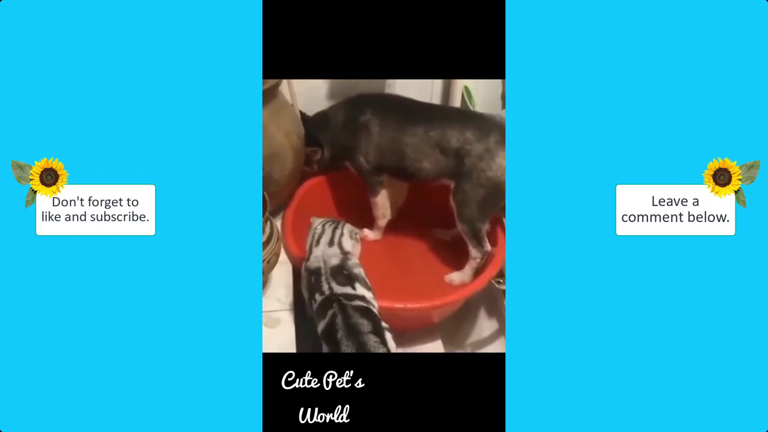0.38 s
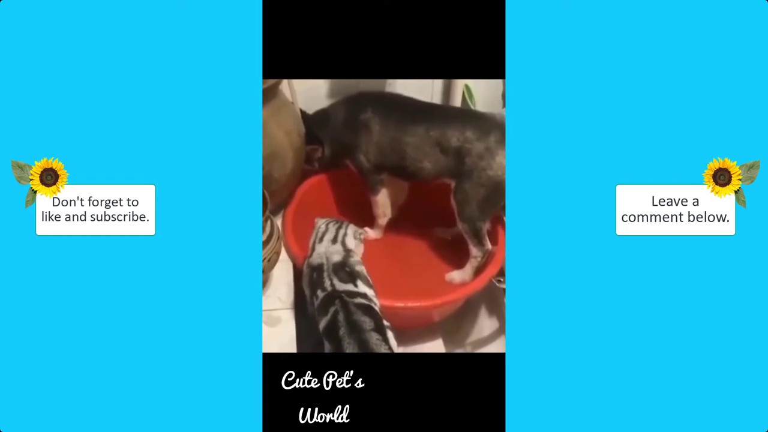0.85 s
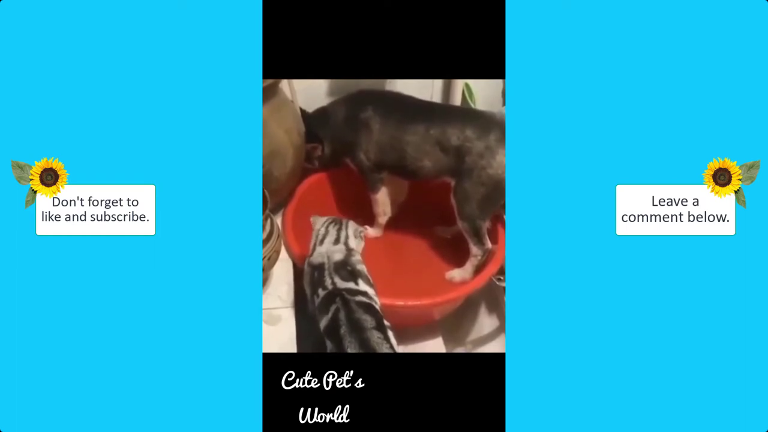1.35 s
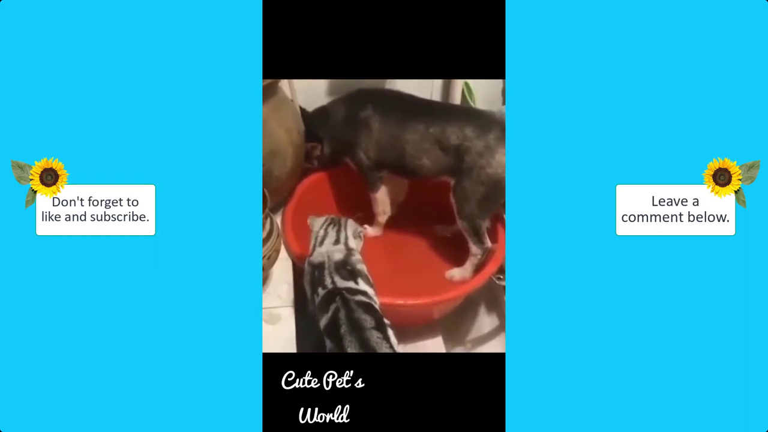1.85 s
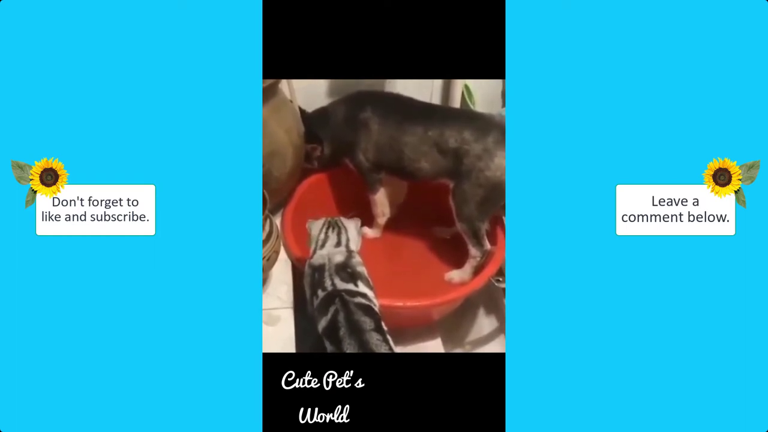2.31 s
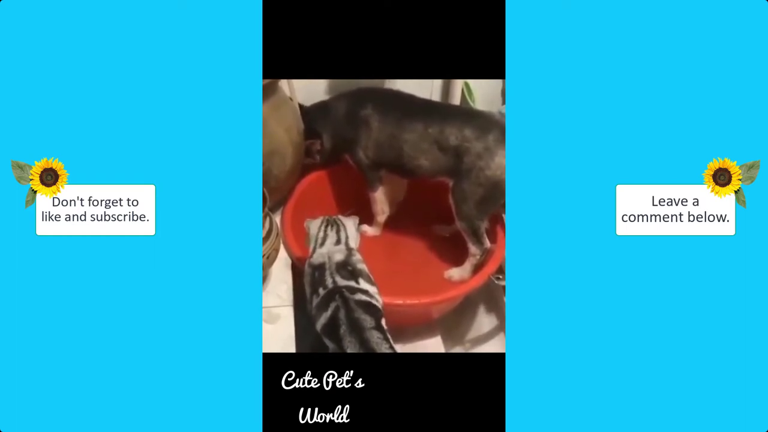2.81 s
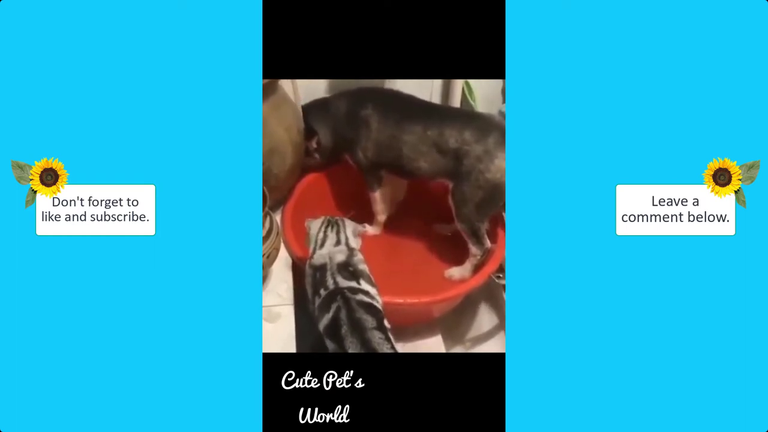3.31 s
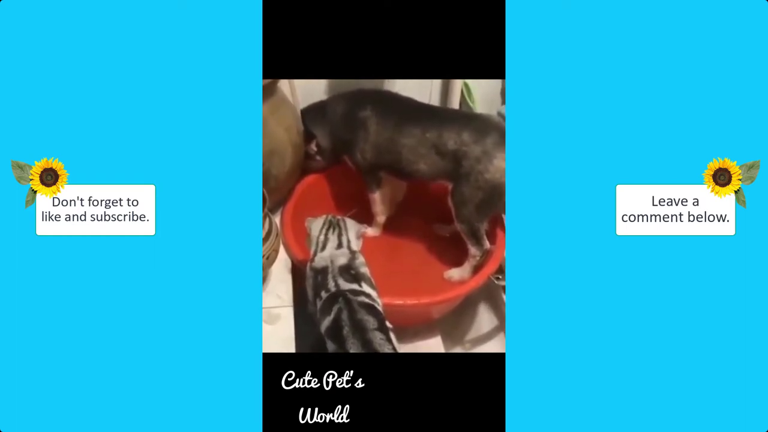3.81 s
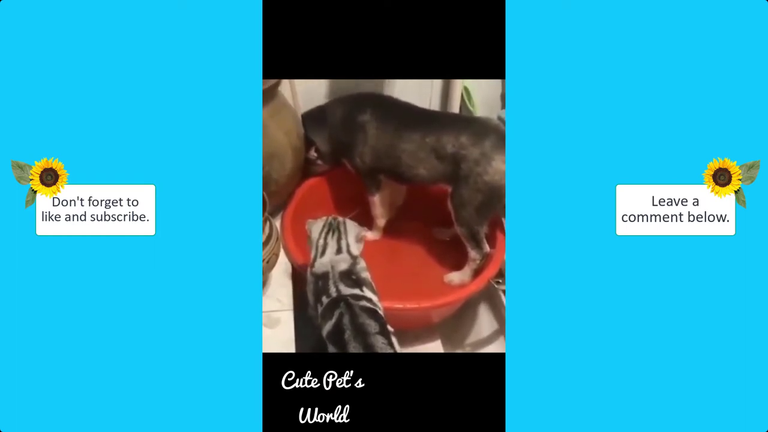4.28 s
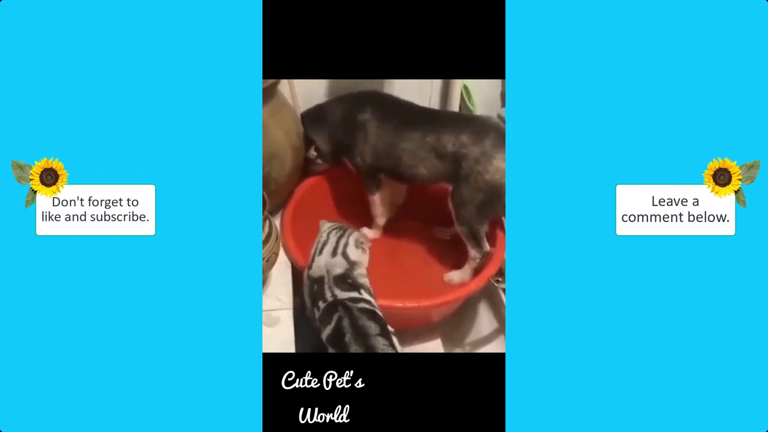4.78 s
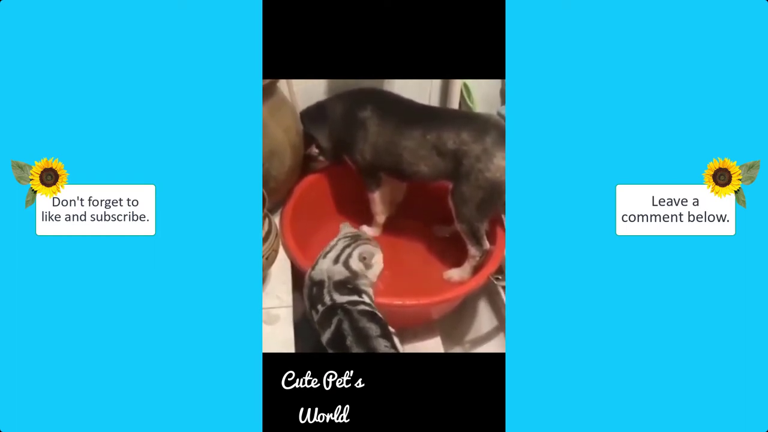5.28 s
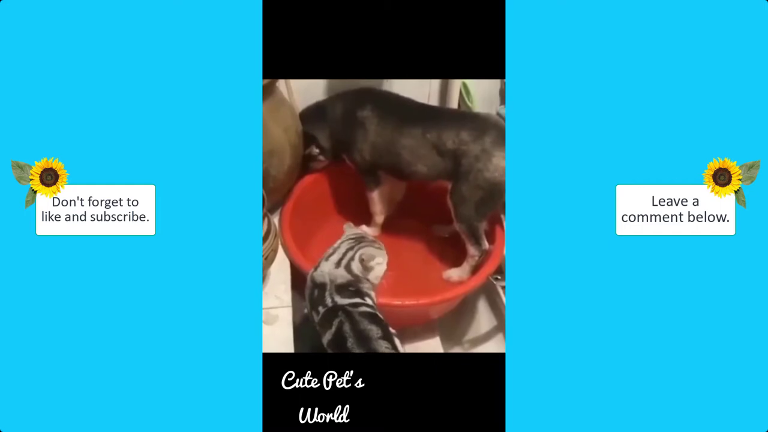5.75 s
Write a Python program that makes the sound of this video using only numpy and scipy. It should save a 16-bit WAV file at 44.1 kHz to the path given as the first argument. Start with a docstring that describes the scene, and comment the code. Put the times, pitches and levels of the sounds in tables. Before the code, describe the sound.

Indoors, a cat wails downward into a growl and lifts briefly, pauses over low hum, then growls into a second drawn-out wavering yowl.

```python
"""Cat yowling in a small hard room

A long falling meow sinks into a throaty growl and lifts into a short rising call; after a pause a growl
opens into a second long yowl that twice breaks into half-pitch rasp. Yowls are sums of overtones shaped by
mouth resonances; growls are slow pulses ringing in chest and throat; air noise flutters around the voice.
A low machine hum, soft hiss and faint far tones lie underneath."""
import sys
import numpy as np
from scipy import signal
from scipy.fft import rfft, irfft
from scipy.io import wavfile
from scipy.ndimage import uniform_filter1d, minimum_filter1d, map_coordinates

SR = 44100
rng = np.random.default_rng(int(sys.argv[2]) if len(sys.argv) > 2 else 0)


def inscribe(sig):
    """Save sig as 16-bit PCM at rate SR to the path in sys.argv[1].

    A 1-D sig is mono; a 2-D sig holds one channel per row.
    Samples are clipped to [-1, 1] before scaling.
    """
    pcm = np.round(np.clip(np.atleast_2d(sig).T, -1, 1) * 32767)
    wavfile.write(sys.argv[1], SR, pcm.astype(np.int16))


def undo_db(level):
    """Turn decibels back into plain size, where 20 dB means ten times bigger."""
    steps = np.asarray(level, float) / 20
    return 10 ** steps


N = 259308

# Yowls, a list of rows each. Each row: time in seconds, pitch in Hz, then levels in dB: hum through the nose,
# second overtone, overtones at the mouth resonance, upper overtones.
YOWL_TRACKS = [
    [(0.0, 907, -67, -48, -29, -40.5), (0.036, 888, -75, -42, -32.5, -40.5),
     (0.074, 889, -70, -57.5, -21.5, -49), (0.098, 872.2, -56, -46, -37.5, -38),
     (0.138, 870.8, -66, -47.5, -34.5, -42), (0.2, 867.8, -56, -48, -32.5, -36.5),
     (0.232, 867, -62, -37.5, -28.5, -45), (0.274, 869, -67, -78, -30, -50.5),
     (0.302, 865, -55.5, -37.5, -27, -33), (0.418, 848, -53.5, -42.5, -43, -45.5),
     (0.596, 791, -58.5, -44, -49, -46), (0.758, 687.2, -50, -43, -58.5, -55),
     (0.806, 671, -43.5, -54, -60, -57), (0.854, 654.5, -58.5, -38, -50.5, -62.5),
     (1.018, 618.7, -49.5, -48.5, -58.5, -65), (1.092, 607, -48, -49.5, -48.5, -57),
     (1.222, 562.7, -45, -43, -55, -57.5), (1.288, 559.2, -48, -45, -64, -71.5),
     (1.31, 557, -74, -73, -55, -67.5)],
    [(1.74, 531.3, -59, -69, -87, -87), (1.78, 564.3, -47, -54, -79, -73),
     (1.816, 582.4, -44, -50, -69, -81), (1.85, 646, -58.5, -66.5, -74, -58),
     (1.885, 678, -53, -58.5, -73, -58), (1.92, 677, -55.5, -45.5, -66, -54),
     (1.962, 700, -54.5, -54, -65, -56), (1.969, 705, -55, -36, -62, -56), (1.982, 720, -57, -44, -58, -56),
     (2.002, 752.3, -61.5, -41.5, -56.5, -55.5), (2.078, 775.6, -70, -56.5, -50, -50),
     (2.178, 805.3, -55, -54, -50, -53.5), (2.25, 706, -78, -61, -62.5, -69)],
    [(3.34, 563.5, -59, -59, -77, -88), (3.39, 600.6, -55, -67, -84, -81),
     (3.42, 676.7, -51.5, -65, -91, -100), (3.46, 739, -56, -60, -61, -61),
     (3.49, 758, -64.5, -49.5, -66.5, -95), (3.53, 766, -60, -50, -52, -55),
     (3.58, 824.5, -66, -56, -44.5, -67), (3.59, 829, -60.5, -50.5, -53, -64),
     (3.71, 897.5, -71.5, -51.5, -53.5, -49), (3.78, 881.6, -64.5, -58.5, -44.5, -45),
     (3.9, 878, -68, -52, -42, -45), (3.97, 866.4, -66, -53, -38, -51),
     (4.04, 853.7, -57.5, -52.5, -41.5, -44.5), (4.12, 853.7, -57, -51.5, -33.5, -42),
     (4.2, 835.4, -60, -52, -47, -47), (4.26, 791.7, -66, -55.5, -34, -47.5),
     (4.35, 761.5, -67.5, -51.5, -36.5, -48.5), (4.42, 781.7, -76.5, -55, -31.5, -42),
     (4.54, 799.5, -60.5, -54, -25, -52), (4.59, 803.8, -64, -49, -29.5, -42.5),
     (4.69, 795.6, -65, -54, -29.5, -45), (4.75, 786, -63, -51.5, -35.5, -50),
     (4.81, 817, -62, -60, -35.5, -44), (4.87, 753, -66.5, -55, -38, -48.5),
     (4.93, 748.4, -65.5, -55, -45.5, -50), (4.99, 782, -68, -49.5, -40, -69),
     (5.05, 783, -64.5, -46.5, -63, -79), (5.11, 743.3, -57.5, -60, -59, -62),
     (5.2, 733.4, -62, -49, -53, -58.5), (5.29, 706, -61, -53, -48, -64.5),
     (5.36, 705.8, -56.5, -47.5, -57, -65), (5.47, 726.5, -81, -46.5, -43, -57),
     (5.54, 723.2, -65.5, -47.5, -45.5, -57), (5.59, 730.7, -63, -48, -56.5, -58),
     (5.68, 748.2, -66.5, -41.5, -53, -68), (5.77, 741.8, -76, -44, -51, -68.5),
     (5.87, 749, -68.5, -44, -53.5, -54)],
]
# Upper mouth resonances. Each row: centre in Hz, width in Hz, gain in dB.
UPPER_MOUTH = [(2910, 1300, 10.5), (3660, 960, -5.5), (6140, 1400, -11.5), (6950, 230, -8.5),
               (8930, 300, -19.5)]
# Catches in the voice: uneven cycles with a puff of air. Each row: centre in seconds, half length in seconds,
# air below 5 kHz in dB, air above 5 kHz in dB, added roughness (0-1).
VOICE_CATCHES = [(.195, .045, -57, -58, .3), (.76, .11, -68, -68, .12), (1.05, .3, -82, -76, .03),
                 (1.94, .06, -72, -69, .16), (2.225, .04, -61, -70, .3), (3.54, .05, -70, -67, .12),
                 (3.74, .06, -55, -63, .17), (3.87, .14, -66, -66, .07), (4.05, .05, -66, -72, .08),
                 (4.33, .09, -65, -70, .1), (4.835, .07, -60, -59, .12), (4.93, .06, -68, -70, .08),
                 (4.995, .04, -67, -77, .28), (5.27, .06, -74, -74, .07)]


def rms_one(x):
    """Scale to unit rms."""
    return x / np.sqrt(np.mean(x ** 2) + 1e-20)


def in_time(rows):
    """Columns of a table after the time, joined by straight lines at every sample."""
    s, *columns = np.transpose(rows)
    return [np.interp(np.arange(N) / SR, s, c) for c in columns]


def sounding(rows, fade_s):
    """1 within the table's span, fading to 0 outside both ends."""
    t = np.arange(N) / SR
    rise, fall = t - rows[0][0] + fade_s, rows[-1][0] + fade_s - t
    return np.clip(np.minimum(rise, fall) / fade_s, 0, 1)


def peak(s, half_s):
    """A triangle of height 1 in time."""
    return np.clip(1 - np.abs(np.arange(N) / SR - s) / np.maximum(half_s, .01), 0, 1)


def drift(rate_hz):
    """Low-passed chance: noise twice through a one-pole filter; spread 1."""
    r = np.exp(-2 * np.pi * rate_hz / SR)
    noise = rng.standard_normal(N + SR)
    return rms_one(signal.lfilter([1], [1, -2 * r, r * r], noise)[SR:])


def wander(size, rate_hz):
    """Smooth chance for a short stretch: random knots joined by splines; spread about 1."""
    knots = rng.standard_normal(int(size * rate_hz / SR) + 4)
    return map_coordinates(knots, [1 + np.arange(size) * rate_hz / SR], order=3)


def resonate(x, hz, width_hz):
    """Two-pole resonance with gain 1 on top."""
    r = np.exp(-np.pi * width_hz / SR)
    poles = [1, -2 * r * np.cos(2 * np.pi * hz / SR), r * r]
    return signal.lfilter([(1 - r * r) / 2, 0, (r * r - 1) / 2], poles, x)


def ring_twice(x, hz, width_hz):
    """Two equal resonances in series, for steeper skirts."""
    return resonate(resonate(x, hz, width_hz), hz, width_hz)


def hump(hz, centre_hz, width_hz):
    """Gain of a resonance at a given frequency: 1 at the centre, 1/2 half a width away."""
    return 1 / (1 + (2 * (hz - centre_hz) / width_hz) ** 2)


def yowl(rows):
    """Vocal folds give overtones; nose, moving mouth and upper resonances set the levels of their groups."""
    # Each row: time in seconds, level of the overtones above about 5 kHz in dB,
    # depth of the valley between the two mouth resonances in dB (negative: none).
    colours = [
        [(0.0, -49, 6), (0.148, -48.5, -1), (0.162, -49, -3), (0.558, -50, 11), (0.574, -50, 18),
         (0.702, -56.5, -13), (0.736, -63, 1), (1.244, -73, 4.5), (1.33, -87, 0)],
        [(1.75, -100, 16), (1.885, -88, 13), (1.91, -56, 6), (1.934, -63.5, 10), (1.966, -57, 10),
         (1.984, -61, 12), (2.166, -66, 8), (2.186, -63, 15), (2.25, -73, 5)],
        [(3.4, -100, 16), (3.432, -95, 7), (3.438, -87, 4), (3.532, -58.5, 1), (3.746, -49, 0), (4.24, -65, 6),
         (4.456, -50.5, 5.5), (4.58, -57, 12.5), (4.7, -52.5, 6)],
        [(4.7, -51, -2), (4.878, -51, -0.5), (4.91, -69.5, -5), (5.044, -72, -1), (5.096, -61.5, 11),
         (5.436, -71, 12.5), (5.504, -59, 34), (5.834, -54, -14), (5.87, -58, -3)],
    ]
    # Fading of the top overtones. Each row: time in seconds, cut in dB (negative: none).
    top_cut = [(0.0, -1), (0.45, 0.5), (0.6, 8.5), (0.75, 39), (1.3, 41), (1.85, 2), (1.92, -14),
               (2.25, -6), (3.45, 11), (3.7, 1), (4.2, -23.5), (4.5, 6), (4.88, -8), (4.96, 24.5),
               (5.2, 14.5), (5.45, 18), (5.6, 13), (5.87, 15.5)]
    flicker_db, flicker_hz = 1.5, 14
    mouth_multiple, mouth_width_hz = 2.984, 444            # multiple of the pitch
    back_multiple, back_width_hz, back_db = 5.0, 350, 7    # second mouth resonance, moving with the pitch
    valley_multiple, valley_width = 4.0, .8                # multiples of the pitch
    upper_follow, upper_at_hz = 0.53, 800                  # exponent of the pitch ratio, reference pitch
    dull_above_hz = 6400

    on = sounding(rows, fade_s=0.011)
    span = on > 0
    pitch, nose_db, second_db, mouth_db, bright_db = [c[span] for c in in_time(rows)]
    size = len(pitch)
    shrill_db, valley_db = [c[span] for c in in_time(np.concatenate(colours))]
    top_cut_db = in_time(top_cut)[0][span]
    flicker = [flicker_db * wander(size, flicker_hz) for _ in range(4)]
    nose_db, second_db, mouth_db, shrill_db = np.array([nose_db, second_db, mouth_db, shrill_db]) + flicker
    half, shift_hz, rough = [c[span] for c in (*rasps(), roughness())]

    mouth_hz = mouth_multiple * pitch + shift_hz
    opening = (pitch / upper_at_hz) ** upper_follow     # the mouth closes as the pitch falls
    pitch = pitch * (1 + (.003 + .035 * rough) * drift(30)[span])     # cycles vary in length
    turns = np.cumsum(pitch) / SR
    shaken = np.sqrt(1 - rough ** 2) + rough * drift(110)[span]       # cycles vary in strength

    parts, powers = np.zeros((3, size)), np.full((3, size), 1e-12)    # mouth, bright, shrill
    for k in np.arange(2.5, 17, .5):
        hz = k * pitch
        source = half if k % 1 else 1       # strong-weak cycles put lines at the half steps
        source = source * undo_db(-np.maximum(valley_db, 0) * hump(k, valley_multiple, valley_width))
        above_mouth = 1 / (1 + (np.minimum(3250, 3.75 * pitch) / hz) ** 16)
        shrill = 1 / (1 + (4900 / hz) ** 16)
        low = (1 - above_mouth) * hump(hz, mouth_hz, mouth_width_hz) ** 0.79
        upper = sum(undo_db(db) * hump(hz, f * (opening if f < 5000 else 1), w) for f, w, db in UPPER_MOUTH)
        upper = above_mouth * (hz < 11000) * upper
        upper = upper + above_mouth * undo_db(back_db) * hump(hz, back_multiple * pitch, back_width_hz)
        upper = upper * undo_db(-np.maximum(top_cut_db, 0) / (1 + (dull_above_hz / hz) ** 16))
        upper = upper * undo_db(9 * rough ** .5 * wander(size, 70))       # uneven cycles break up each line
        upper = upper * undo_db(4.9 * wander(size, 22))       # each upper overtone wavers in level by chance
        gains = source * np.array([low, upper * (1 - shrill), upper * shrill])
        parts += gains * np.sin(2 * np.pi * (k * turns + rng.random()))
        powers += gains ** 2 / 2

    nose = np.sqrt(2) * (np.sin(2 * np.pi * turns) + half * undo_db(-14) * np.sin(np.pi * turns))
    second = np.sqrt(2) * (np.sin(4 * np.pi * turns) + half * undo_db(-16.0) * np.sin(3 * np.pi * turns))
    levels = undo_db(np.array([mouth_db, bright_db, shrill_db]))
    mouth = np.sum(levels * parts / np.sqrt(powers), axis=0)
    out = np.zeros(N)
    out[span] = shaken * (undo_db(nose_db) * nose + undo_db(second_db) * second + mouth)
    return out * on


def roughness():
    """Calm cycles, uneven in the catches, slack folds where a yowl starts or dies."""
    calm, slack, slack_s = .025, .3, .04
    ends = [rows[k][0] for rows in YOWL_TRACKS for k in (0, -1)]
    ends = [s for s in ends if slack_s < s < N / SR - slack_s]
    caught = sum(rough * peak(s, half_s) for s, half_s, _, _, rough in VOICE_CATCHES)
    return calm + caught + slack * sum(peak(s, slack_s) for s in ends)


def rasps():
    """Strong-weak alternation of the folds: gain of the half-step lines, shift of the mouth resonance in Hz."""
    # Each row: start in seconds, length in seconds, half-step lines in dB, mouth resonance shift in Hz.
    rasp_rows = [(3.725, 0.27, 5, 427.5), (4.856, 0.11, 5.5, 138), (4.936, 0.052, 10, -340)]
    edge_s, plain_db = 0.08, -26.5
    ragged_db, ragged_hz = 3, 50      # the half-step lines come unevenly
    shapes = [sounding([(s,), (s + length,)], edge_s) for s, length, _, _ in rasp_rows]
    half_db = [plain_db + (row[2] - plain_db) * shape for row, shape in zip(rasp_rows, shapes)]
    half = undo_db(np.max(half_db, axis=0) + ragged_db * drift(ragged_hz))
    return half, sum(row[3] * shape for row, shape in zip(rasp_rows, shapes))


def breath():
    """Fluttering air noise in the upper mouth resonances, below and above 5 kHz, with puffs at the catches."""
    steady_db = -90.5
    air = rng.standard_normal(N) * undo_db(3.0 * drift(40))
    below = [m for m in UPPER_MOUTH if m[0] < 5000]
    above = [m for m in UPPER_MOUTH if m[0] >= 5000]
    out = np.zeros(N)
    for column, modes in ((2, below), (3, above)):
        rung = sum(undo_db(db) * ring_twice(air, f, w) for f, w, db in modes)
        level = undo_db(steady_db) * sum(sounding(rows, fade_s=0.038) for rows in YOWL_TRACKS)
        for row in VOICE_CATCHES:
            level = level + undo_db(row[column]) * np.sin(np.pi / 2 * peak(*row[:2])) ** 2
        out += level * rms_one(rung)
    return out


def growl():
    """Slack folds flap in slow uneven pulses that ring in the chest and the closed throat."""
    # Growls, a list of rows each. Each row: time in seconds, level in dB, chest part in dB above the throat.
    growl_tracks = [
        [(1.31, -54, -17), (1.346, -54.5, -0.5), (1.434, -60, 4), (1.53, -56.5, -8), (1.59, -56, 1),
         (1.656, -53, 3), (1.72, -51.5, -2.5), (1.77, -55.5, -28)],
        [(3.18, -74, 0), (3.21, -55, -1), (3.27, -62, 4), (3.305, -57, -4), (3.352, -59, 2), (3.38, -67, -17)],
    ]
    # Chest, throat and air resonances (air passes each twice). Each row: centre in Hz, width in Hz, gain in dB.
    chest_modes, throat_modes, air_modes = [(210, 74, 2.5), (271, 65, 8.5)], [(442.7, 20.5, 6.5), (613, 71, 4.5),
                                                           (1150, 120, -8), (1680, 1200, -26.5)], [(1770, 330, 0),
                                                                           (3460, 410, -0.5),
                                                                           (5280, 340, -5),
                                                                           (8400, 850, -16.5)]
    flaps_per_s, jitter, flap_cut_hz = 73, .055, 1950
    air_db = -19.5      # relative to the throat

    turns = np.cumsum(flaps_per_s * (1 + jitter * drift(25))) / SR
    pulses = np.diff(np.floor(turns), prepend=0) * undo_db(2.6 * rng.standard_normal(N))
    air = rng.standard_normal(N) * np.exp(-3.0 * (turns % 1))      # air escaping at each flap
    soften = signal.butter(2, flap_cut_hz, fs=SR, output="sos")
    pulses = signal.sosfilt(soften, pulses + 0.03 * air)
    air = undo_db(air_db) * rms_one(sum(undo_db(db) * ring_twice(air, hz, w) for hz, w, db in air_modes))

    def body(modes):
        """Resonances in parallel with alternating sign."""
        return rms_one(sum((-1) ** k * undo_db(db) * resonate(pulses, hz, w) for k, (hz, w, db) in enumerate(modes)))

    chest, throat = body(chest_modes), body(throat_modes)
    out = np.zeros(N)
    for rows in growl_tracks:
        level_db, chest_db = in_time(rows)
        out += undo_db(level_db) * sounding(rows, fade_s=0.044) * (throat - undo_db(chest_db) * chest + air)
    return out


def room(x):
    """Dense reflections: noise that dies away, duller as it goes."""
    t60_s, wall_cut_hz, wet = 0.32, 6600, undo_db(-5.5)
    t = np.arange(int(.6 * SR)) / SR
    noise = rng.standard_normal((2, len(t)))
    dull = signal.sosfilt(signal.butter(1, wall_cut_hz, fs=SR, output="sos"), noise[0])
    decay = undo_db(-60 * t / t60_s)
    tail = (dull + noise[1] * .5 * decay) * decay * (t > .003)     # the bright part dies twice as fast
    tail = tail / np.sqrt(np.sum(tail ** 2))
    return (x + wet * signal.fftconvolve(x, tail)[:N]) / np.sqrt(1 + wet ** 2)


def background():
    """Shaped noise for hiss, narrow noise bands for a wavering hum, and faint tones that come and go far away."""
    # Hiss spectrum. Each row: frequency in Hz, relative density in dB per Hz.
    hiss_rows = [(30, -19), (60, -7.5), (120, -5), (250, -8), (500, -11), (1200, -13.5), (2900, -18.5),
                 (3400, -24.5), (6000, -29.5), (9500, -33)]
    # Hum bands. Each row: centre in Hz, width of each of two passes in Hz, level in dB.
    hum_bands = [(79, 5.7, -68.5), (146.1, 26, -67), (222, 53, -75.5), (291.5, 28, -74), (410, 59, -82.5)]
    # Far tones. Each row: start in seconds, length in seconds, frequency in Hz, level in dB.
    far_tones = [(2.29, 0.16, 3400, -84), (2.373, 0.15, 1328, -71.5), (2.382, 0.12, 686, -73),
                 (2.687, 0.1, 2830, -77.5), (2.896, 0.22, 2880, -79), (3.127, 0.04, 1550, -76),
                 (2.935, 0.095, 1624, -74), (2.945, 0.1, 2388, -70), (3.143, 0.11, 2290, -75.5),
                 (3.148, 0.19, 2820, -74)]
    hiss_db, far_width_hz = -64.5, 60

    hz = np.maximum(np.fft.rfftfreq(N, 1 / SR), 1)
    colour_hz, colour_db = np.transpose(hiss_rows)
    colour = undo_db(np.interp(np.log(hz), np.log(colour_hz), colour_db))
    hiss = rms_one(irfft(rfft(rng.standard_normal(N)) * colour, N))
    out = undo_db(hiss_db + 0.2 * drift(3.9)) * hiss
    for f, w, db in hum_bands:
        out += undo_db(db) * rms_one(ring_twice(rng.standard_normal(N), f, w))
    noise = rng.standard_normal(N)
    for s, length, f, db in far_tones:
        tone = rms_one(ring_twice(noise, f, far_width_hz))
        out += undo_db(db) * tone * sounding([(s,), (s + length,)], fade_s=0.036)
    return out


def scene():
    """The cat in the room over the background."""
    cat = sum(yowl(rows) for rows in YOWL_TRACKS) + growl() + breath()
    return (room(cat) + background())[None, :]


def thin_spectrum(x, depth_db, under_db, lowest_hz):
    """Turns down bands far under a strong neighbour and thins the quietest treble patches."""
    gate_above_hz, gate_share_percent, gate_db = 3600, 8, 16     # the gate is full from 1.5 times this frequency
    hz, _, frames = signal.stft(x, SR, nperseg=2048, noverlap=1536)
    power = np.abs(frames) ** 2
    level_db = 10 * np.log10(uniform_filter1d(power, size=7, axis=-2) + 1e-20)
    strongest_db = -minimum_filter1d(-level_db, size=61, axis=-2)
    weak = np.clip((strongest_db - under_db - level_db) / 7, 0, 1) * (hz > lowest_hz)[:, None]
    patch = uniform_filter1d(uniform_filter1d(power, size=24, axis=-2), size=2, axis=-1)
    patch_db = 10 * np.log10(patch + 1e-20)
    threshold_db = np.percentile(patch_db, gate_share_percent, axis=-1, keepdims=True)
    treble = np.clip(2 * (hz / gate_above_hz - 1), 0, 1)[:, None]
    quiet = np.clip(threshold_db - patch_db, 0, 1) * treble
    frames = frames * undo_db(-depth_db * weak - gate_db * quiet)
    return signal.istft(frames, SR, nperseg=2048, noverlap=1536)[1][..., :N]


def low_pass(x):
    """Removes everything above the highest recorded frequency."""
    return signal.sosfilt(signal.butter(12, 9630, fs=SR, output="sos"), x)


def record(dry):
    """The finished mix, with weak bands beside strong ones and quiet treble patches turned down."""
    mix = thin_spectrum(dry, depth_db=20, under_db=23, lowest_hz=1000)
    return low_pass(mix)


dry = scene()
out = record(dry)
inscribe(out)
```